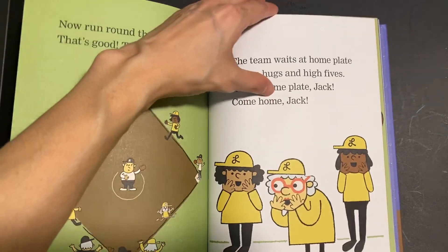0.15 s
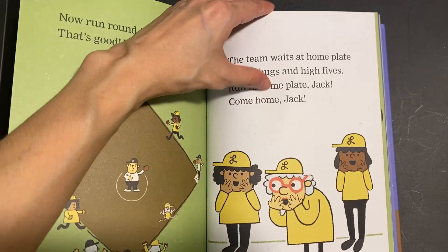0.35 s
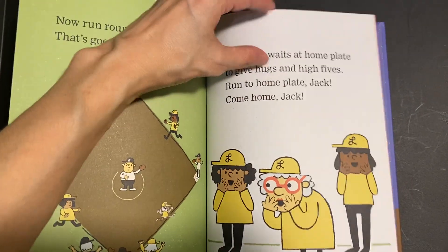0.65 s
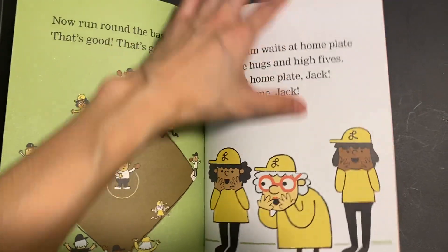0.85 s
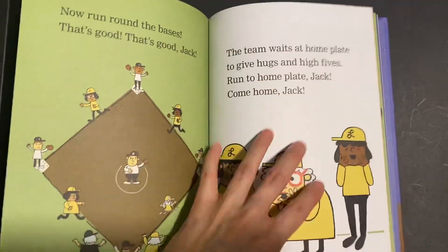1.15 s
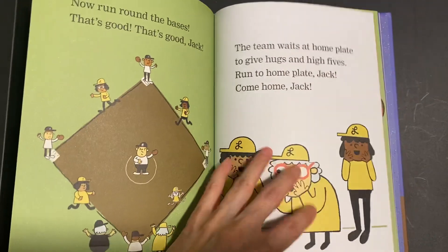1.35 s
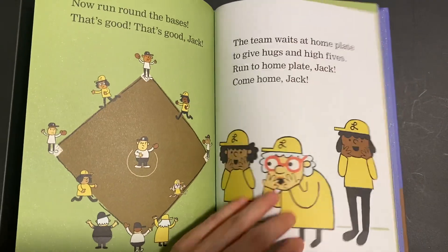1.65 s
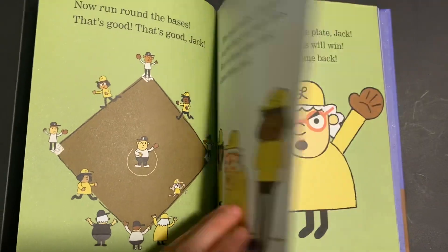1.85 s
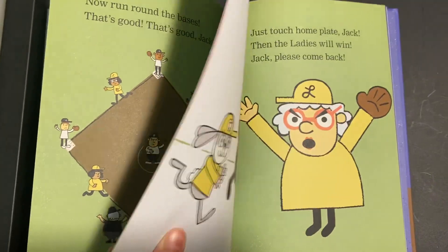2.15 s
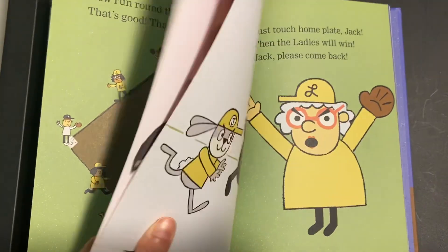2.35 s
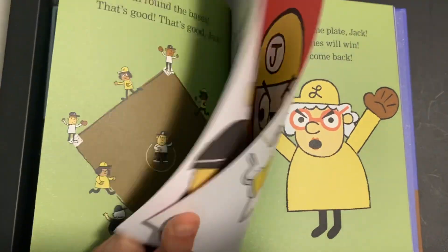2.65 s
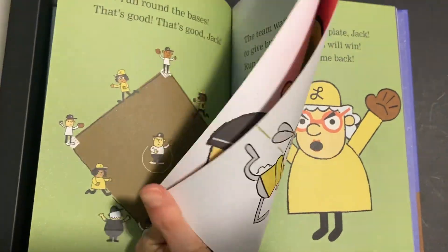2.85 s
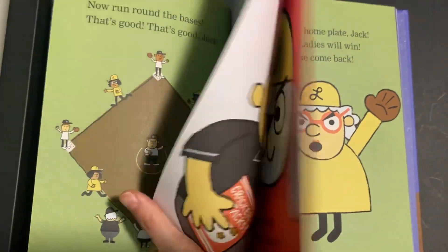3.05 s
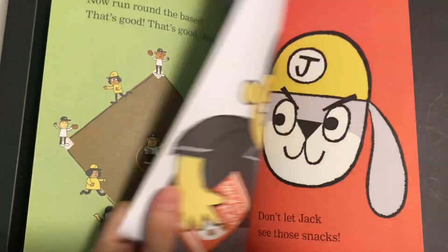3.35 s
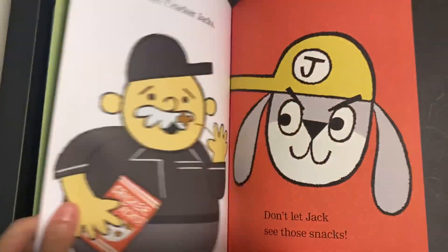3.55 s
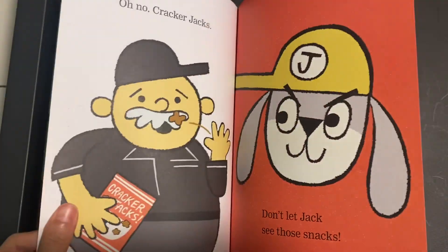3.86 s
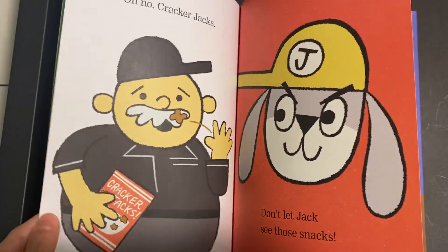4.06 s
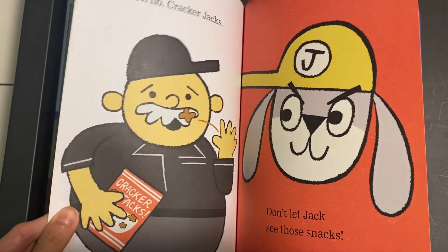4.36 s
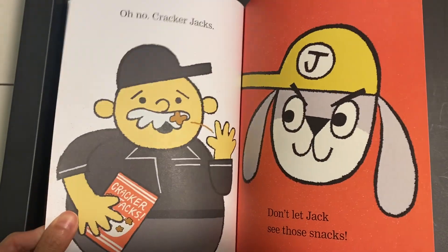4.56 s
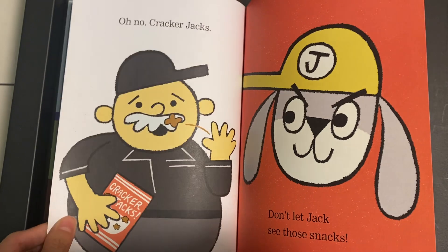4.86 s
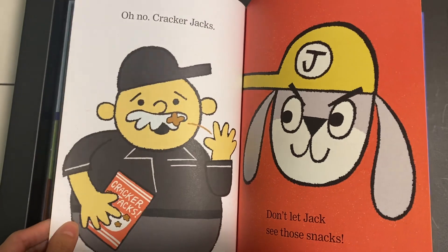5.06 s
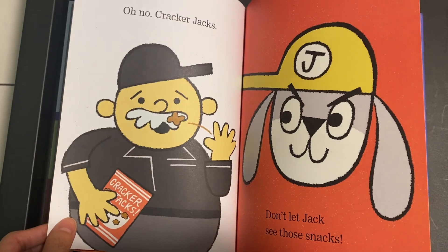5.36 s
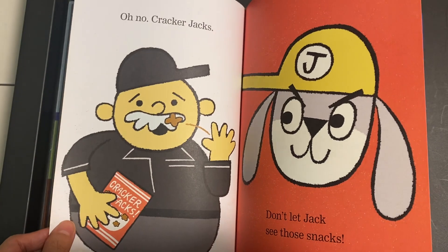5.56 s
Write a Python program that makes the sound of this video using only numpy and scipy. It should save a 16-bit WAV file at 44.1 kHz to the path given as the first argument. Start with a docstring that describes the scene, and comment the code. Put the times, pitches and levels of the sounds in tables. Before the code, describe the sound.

A close stereo pickup above a picture book in a small quiet room, with a low rumble and faint unsteady hum throughout. From 0 s fingertips judder and rub softly on the page; a brisk rub peaks near 0.4 s, with a clustered dull tap at 0.53 s and a softer one at 0.83 s. Light strokes and tiny ticks continue from 1.1 to 1.9 s. At about 2.15-2.5 s the stiff sheet lifts with a scratchy hissing slide, light snaps and a faint low wobble. Sparse scrapes and small flicks follow, with a light snap at 2.8 s and more sliding to 3.5 s. Loud, dry snaps cluster at 3.6-3.85 s, then again at 4.2-4.55 s, strongest around 4.3 and 4.4 s, with deep soft thumps and brief papery twangs. Small ticks and thin rustles fade after 4.6 s, leaving near stillness and a few faint finger touches around 5.4-5.7 s.

```python
"""A small quiet room, with a picture book on a desk, heard from close above.
Fingers rub and catch on a page; its stiff sheet flexes, scrapes over its neighbour and buckles with sharp snaps.
Rubbing is shaped noise with loose clicks; snaps and ticks are bursts of clicks with a fading ring.
Gliding tones make the wobbles, twangs and thumps. A low rumble and an unsteady hum lie underneath."""
import sys
import numpy as np
from scipy import signal
from scipy.fft import rfft, irfft
from scipy.io import wavfile

SR = 44100
rng = np.random.default_rng(int(sys.argv[2]) if len(sys.argv) > 2 else 0)


def unload_audio(sound):
    """Save the sound as a 16-bit wav file, at the path given as the first command line argument."""
    columns = np.transpose(np.atleast_2d(sound))
    # keep every value between -1 and 1, then stretch to whole-number steps
    steps = np.round(np.clip(columns, -1, 1) * 32767)
    wavfile.write(sys.argv[1], SR, steps.astype(np.int16))


N = 251370
TIME = np.arange(N) / SR  # [s]
BLOW = 2 ** 14  # room for one blow and its ring [samples]

# The sheet buckles; levels are relative, before the overall settings in scene():
# (time [s], level [dB], flap [dB], crack [dB], crumple length [s], lag of low tones [cycles],
#  resonance of the buckling patch [Hz], its gain [dB], weak band of the patch [Hz])
SNAPS = [(2.145, -29.5, -13, -24, .0057, 1, 1100, 3, 2100),
         (2.335, -26.5, -14, -27, .0023, 1, 900, 2, 2700), (2.813, -27, -22, -12, .0044, .8, 1900, 4, 2800),
         (3.576, -28.5, -10.5, -18.5, .008, 1.4, 950, 6, 1600),
         (3.618, -14.5, -18, -31, .002, 1.35, 1200, 3, 2200),
         (3.65, -15, -28, -23.5, .0024, .7, 1700, 2, 3200),
         (3.748, -13.7, -18, -21, .0028, 1.15, 2150, 5.5, 770),
         (3.834, -19.5, -16.5, -16, .0018, 1.22, 2500, 6, 760),
         (4.199, -19, -21.5, -19, .006, .7, 850, 5, 1620),
         (4.296, -12, -18.5, -27.5, .002, 1.05, 950, 3, 1750),
         (4.314, -25, -20, -29, .003, .99, 950, 6, 1700), (4.407, -11, -18, -26.5, .0017, 1, 1280, 4, 1680),
         (4.43, -28, -17.5, -27, .0014, 1, 1000, 5, 1700),
         (4.511, -18.5, -18, -22, .004, 1.2, 1100, 6, 1650),
         (4.549, -18.5, -27, -17.5, .0023, .87, 2000, 2.5, 750)]
# Widths of a snap's resonance and weak band [octaves], and the depth of that band [dB]
PATCH_OCTAVES, DIP_OCTAVES, DIP_DB = .3, .1, 7.5
# Tone colour of a snap: (frequency [Hz], gain [dB])
SNAP_COLOUR = [(30, -6.5), (80, 9), (130, 2), (260, 4.5), (410, -8.5), (580, -4), (750, -4), (950, -2.5),
               (1400, -5.5), (2250, -5), (2700, -11), (4000, 4), (7000, 2), (11000, -7.5), (16000, -20.5)]

# How long the ring of sheet, desk and room takes to fall by 60 dB: (frequency [Hz], time [s])
RING_T60 = [(60, .4), (120, .14), (240, .38), (480, .38), (960, .18), (1920, .36), (3840, .38), (7680, .3)]
# Strength of that ring before the overall ring setting: (frequency [Hz], energy against the blow [dB])
RING_DB = [(60, 4.5), (250, -.5), (600, -2.5), (1500, -4.5), (3000, -7.5), (8000, -2.5)]
# Steady ringing tones of the room, each strength varied by chance and then by the ring setting:
# (frequency [Hz], time to fall by 60 dB [s], energy against the blow [dB])
ROOM_MODES = [(183.9, .2, -21), (266, .19, -21), (345, .22, -19.5), (499, .28, -22), (560, .2, -19),
              (745, .14, -30), (946, .16, -26), (1397, .12, -29), (1886, .12, -30), (2078, .1, -28),
              (3070, .073, -32)]
RING_BUILD_S, RING_LUMPS_DB = .003, 2.2  # the ring builds up, then dies unevenly
RING_CRACKLE_DB, RING_CRACKLES_PER_S = 3.0, 450  # the paper crackles on while a blow dies away

# Fingers catch and paper edges flick; levels are relative, before the overall settings:
# (time [s], level [dB], treble [dB], length [s])
TICKS = [(.317, -38, -1, 0.003), (.34, -24, -4.5, 0.0036), (.519, -16.5, -19, 0.002),
         (.530, -11.5, -19.5, 0.0046), (.540, -17, -12, 0.0029), (.826, -21, -29, 0.0035),
         (.847, -27, -34, 0.0046), (.895, -34, -30, 0.003), (1.122, -43, -30, 0.0033),
         (1.176, -38.5, -15, 0.0069), (1.632, -32.5, -26, 0.0023), (1.651, -34, -26, 0.0035),
         (1.679, -35, -35, .003), (2.123, -35, -12, 0.0041), (2.218, -31.5, 5, 0.0077),
         (2.764, -44, 3, 0.0011), (3.019, -31, -9, .002), (3.025, -46, 16, 0.0021),
         (3.113, -42.5, -7, 0.0018), (3.244, -30, -24.5, 0.0025), (3.633, -22, -29.5, .005),
         (3.767, -23, -31, 0.0041), (3.789, -25, -34, .004), (3.861, -21.5, -15.5, 0.0045),
         (4.207, -24, -9, 0.005), (4.324, -18, -15.5, 0.0022), (4.338, -34, -35, 0.0038),
         (4.458, -32.5, -30.5, 0.0035), (4.533, -25, -9, 0.0067), (4.63, -24.5, -13, 0.0014),
         (4.666, -28, -13, 0.002), (4.713, -38, -2, 0.0051), (4.974, -43, -30, 0.004)]
# Tone colour of ticks and single fibre clicks: (frequency [Hz], gain [dB])
TICK_COLOUR = [(80, -12), (350, -16.5), (650, -6.5), (880, -1), (1100, -4.5), (1350, 2), (1800, -4),
               (2300, -2.5), (2700, -3.5), (3500, -9.5), (4300, -1.5), (5100, 4), (6500, -2.5), (11000, -7),
               (16000, -11.5)]
# A fingertip judders in a short run of slips, also set before the overall tick settings:
# (time [s], length [s], level of the first slip [dB])
JUDDERS = [(0.0645, .054, -35), (0.214, .026, -34), (0.260, .015, -37)]
# Time between slips [s], its random share, fading [dB/s], treble [dB]
SLIP_S, SLIP_JITTER, SLIP_FADE_DB_PER_S, SLIP_TOP_DB = 0.0094, 0.071, 36, -5
SLIP_LENGTH_S, SLIP_VARY_DB = .003, 1.5  # each slip is brief and has a strength of its own

# Sheet slides on sheet; levels are before the mix:
# (time [s], swell [s], ease-off [s], rub [dB], hiss against rub [dB], body against rub [dB])
SHEET_STROKES = [(1.9, .025, .04, -55, -14, 8), (2.0, 0.036, 0.16, -73.5, -34, 22.5),
                 (2.207, 0.009, 0.07, -33.5, -2.5, -9), (2.28, .015, .035, -46, -7, -3),
                 (2.335, 0.0032, .2, -34.5, -7, -7.5), (2.48, 0.07, 0.19, -43, -1, -3),
                 (2.75, 0.015, 0.23, -55, -7, -9), (2.905, 0.0023, 0.095, -53, -1.5, -13),
                 (3.009, 0.0095, 0.0067, -37, 0.5, -30), (3.035, 0.0073, 0.17, -57, -8, 10),
                 (3.234, 0.013, 0.11, -41.5, 2.5, -15.5), (3.31, 0.07, 0.09, -47, 4, -16.5),
                 (3.44, 0.074, 0.048, -47.5, -6.5, -6.5), (3.932, 0.016, 0.033, -43, -7.5, -14.5),
                 (3.96, 0.048, 0.051, -45, -1, -4.5), (4.075, 0.054, 0.0032, -37, -8, -11),
                 (4.14, 0.0075, 0.62, -66.5, -3, 10), (4.714, 0.0025, 0.11, -55.5, 0, -22),
                 (4.852, 0.02, 0.15, -55.5, 2.5, -14), (5.03, 0.049, 0.19, -68.5, -4, -6.5),
                 (5.258, 0.012, 0.087, -62.5, -1.5, -18.5)]
# Tone colour of the sliding sheet, before its three bands are levelled: (frequency [Hz], gain [dB])
SHEET_COLOUR = [(150, 9.5), (270, 2), (520, -5), (1000, -4), (1650, -3), (2400, -3.5), (3300, -2.5),
                (4300, -2), (5500, -2), (6500, -4), (7500, -3.5), (11000, -8.5), (16000, -14.5)]
# The curl of the sheet lifts one band of its hiss for a while; gain is before the loss below:
# (time [s], length [s], frequency [Hz], gain at the top [dB])
CURLS = [(2.195, .115, 1750, 10.5), (2.2, .075, 5400, 7), (2.2, .045, 6200, 5), (2.2, .075, 3680, 9),
         (2.23, .085, 2880, 8), (2.32, .21, 3250, 7.5), (2.33, .1, 2100, 4), (2.36, .23, 1620, 8),
         (2.38, .2, 5750, 4), (3.22, .17, 1490, 5.5), (3.93, .057, 3280, 7), (3.98, .077, 5900, 7.5),
         (4.08, .06, 2930, 7), (4.69, .08, 3600, 6), (4.76, .28, 1580, 8), (4.8, .24, 5300, 6),
         (4.84, .12, 4250, 6), (5.05, .33, 1600, 5), (5.24, .06, 4300, 10), (5.28, .11, 5400, 9)]
CURL_Q, CURL_LOSS_DB = 8.4, 1.5  # sharpness of the band; how far all the hiss is turned down meanwhile

# Fingers stroke the page; levels are before the mix:
# (time [s], swell [s], ease-off [s], rub [dB], hiss against rub [dB], body against rub [dB])
FINGER_STROKES = [(0.0, 0.0088, 0.012, -52, -12, -4), (.02, 0.044, 0.32, -65.5, -7, 6),
                  (.32, 0.03, 0.06, -48.5, -15, -7), (.41, 0.079, 0.027, -39.5, -1.5, -12),
                  (.655, 0.049, 0.08, -60, -15, 0), (.745, 0.0063, 0.024, -61, 4, -12),
                  (.812, 0.012, 0.11, -48, 3, -2), (1.1, 0.0045, 0.14, -58.5, -1.5, -4),
                  (1.23, 0.12, 0.019, -54.5, 1, -13.5), (1.37, 0.082, 0.031, -58, -2, -10),
                  (1.49, 0.071, 0.075, -51, 4, -16.5), (1.58, 0.076, 0.16, -56.5, -28, -2),
                  (1.735, 0.019, 0.32, -54, -2.5, -4.5), (5.428, 0.0083, 0.0033, -55.5, -2, -17),
                  (5.628, 0.006, 0.0061, -59.5, -1, -15.5), (5.668, 0.0073, .01, -61.5, 0, -17)]
# Tone colour of the fingers, before the three bands are levelled: (frequency [Hz], gain [dB])
FINGER_COLOUR = [(150, 4), (380, -10), (700, -10), (870, -6), (1100, -3.5), (1400, -.5), (1800, -5.5),
                 (2400, -5.8), (3600, -8.3), (4400, -8.5), (5150, -7.5), (6300, -12.5), (8000, -13.5),
                 (12000, -12.5), (16000, -16.5)]
# The flat page answers a fingertip: (frequency [Hz], width [Hz], gain at the top [dB])
PAGE = [(867, 78, 2), (1530, 100, 3.5), (2320, 150, -0.5)]

# Before it swells, a stroke makes contact: rise time [s] and rise [dB]
CONTACT_S, CONTACT_DB = 0.014, 26
SWELL_DB, SAG_DB = 11, 5  # rise up to the peak, and fall after it
LIFT_S, LIFT_DB, TAIL_T60_S = 0.0097, 10.5, 0.3  # contact breaks, then a faint tail dies in the room
RUSTLE_HZ = np.geomspace(300, 9000, 15)  # centres of the flickering bands

# The sheet flexes and wobbles: (time [s], length [s], middle pitch [Hz], level [dB])
WOBBLES = [(0.554, .038, 470, -51.5), (0.838, 0.032, 446, -52), (0.876, .04, 299.4, -58),
           (1.585, 0.067, 658, -55.5), (1.729, 0.0215, 573, -51.5), (1.763, 0.066, 333, -63),
           (1.895, .07, 365, -49.5), (1.95, 0.055, 284, -59), (2.02, 0.03, 280, -49),
           (2.034, 0.032, 410, -54.5), (2.06, 0.066, 252, -63), (2.137, 0.042, 308.7, -54),
           (3.025, 0.042, 279, -55), (3.067, 0.0404, 434.4, -55), (3.141, 0.027, 261, -58.5),
           (4.559, .032, 491, -46)]
# Bending tones of the wobbling sheet: (multiple of the pitch [ratio], relative level [dB])
BENDING = [(1.002, 2), (1.598, -9), (2.2, 0.5), (2.9, -16), (3.8, -9)]
RELAX_OCTAVES_PER_S = 4.53  # the pitch of a wobble sinks as the bend relaxes
# After a snap the taut sheet twangs on one sinking tone, before its level flutters:
# (time [s], length [s], middle pitch [Hz], peak level [dB])
TWANGS = [(3.756, .044, 930, -44), (4.2, .02, 2320, -43), (4.318, .034, 940, -46), (4.556, .04, 1020, -48)]
# The sheet drops on the air beneath it with a deep thump, before its level flutters:
# (time [s], length [s], middle pitch [Hz], peak level [dB])
THUMPS = [(2.317, 0.059, 91, -52), (2.502, .08, 65.2, -41.5), (3.033, 0.081, 80, -51),
          (3.842, 0.053, 90, -41), (4.412, 0.031, 75.4, -26), (4.428, 0.034, 111.7, -42),
          (4.51, .066, 88.4, -31.5), (4.618, 0.14, 60.4, -45.5)]

# Early echoes off desk and facing page: (delay left [s], delay right [s], level [dB])
ECHOES = [(.0017, 0.0022, -22.5), (.0043, 0.0024, -29), (.0091, 0.0092, -21), (0.0192, .0178, -26.5)]
# How far the paper sounds lean to the left: (frequency [Hz], left against right [dB])
LEANING = [(60, 1.6), (200, 2), (380, 2.5), (620, 10), (900, 7.5), (1350, 8.5), (2300, 6), (4500, 3),
           (8000, 0), (15000, 0)]
# How wide the noises spread: (frequency [Hz], side against middle [dB])
SPREAD = [(60, -8), (300, -4.5), (700, -4), (1400, -4.5), (3000, -4), (7000, -11), (15000, -14)]
# Phase between the microphone ports: (frequency [Hz], lead of the left [radians])
PORT_PHASE = [(340, -0.23), (800, -1.57), (1550, 1.27), (2100, 0.28), (2650, 1.4), (3100, 0.28),
              (4600, 0.86), (5600, -1.5), (7000, 0.33)]
# In the treble the ports pass in and out of opposite phase: (frequency [Hz], lag of the left [cycles])
PORT_TURNS = [(7300, 0), (8400, .5), (9400, .5), (10500, 1), (11500, 1), (12600, 1.5), (13900, 1.5),
              (14700, 2)]
CUTOFF_HZ = 16000

# Tone colour of the room rumble, before its level is set: (frequency [Hz], relative level [dB])
ROOM_COLOUR = [(20, -40), (35, -16.5), (60, -0.5), (80, -6.5), (115, -12), (150, -15), (190, -22.5),
               (260, -27), (400, -38.5), (650, -40.5), (1200, -43.5), (3000, -53.5), (6000, -54),
               (16000, -67.5)]
ROOM_DB = -59
HUM_HZ, HUM_DB = 56.4, -58.5


def snaps(level_db, crumple_db, ring_db, flap_db, crack_db, lean_db, rebound_db, travel_s, lowest_hz):
    """A buckle sends a bending wave through the sheet: treble arrives first and sweeps down into a low thud."""
    out, hz = np.zeros((2, N)), bins(BLOW)
    pulse = causal(1 / (1 + (hz / 3800) ** 2)) * from_db(lean_db * np.array([[1], [-1]]))
    treble = causal((hz + 30) / (hz + 3000))
    bass = causal(1 / (1 + (hz / 450) ** 2))
    for s, db, flap, crack, length, lag, patch_hz, patch_db, dip_hz in SNAPS:
        bending = np.exp(-2j * np.pi * (lag * np.log(1 + hz / lowest_hz) + travel_s * hz))
        shelves = [(280, flap + flap_db), (700, 0), (2400, 0), (4800, crack + crack_db)]
        patch = patch_db * bump(hz, patch_hz, PATCH_OCTAVES) - DIP_DB * bump(hz, dip_hz, DIP_OCTAVES)
        colour = causal(from_db(at_hz(SNAP_COLOUR, hz) + at_hz(shelves, hz) + patch))
        # the low flap comes back from the edges of the page
        rebound = from_db(rebound_db) * bass * np.exp(-2j * np.pi * hz * rng.uniform(0.022, 0.033))
        crumpling = from_db(crumple_db) * crumple(length, rise=0.00027) * treble
        blow = pulse * bending * (1 + rebound) + crumpling
        ringing = from_db(ring_db) * ring() * bending
        add(out, s, from_db(db + level_db) * dying(colour * (blow + ringing)))
    return out


def crumple(length, rise):
    """Spectrum of a short run of tiny fibre clicks, of unit energy."""
    age = TIME[:BLOW]
    shape = np.exp(-age / length) * (1 - np.exp(-age / rise))
    clicks = rng.standard_normal(BLOW) * from_db(2 * rng.standard_normal(BLOW)) * shape
    return rfft(clicks / np.sqrt(np.sum(clicks ** 2)))


def ring():
    """Spectrum of the tail after a blow: crackling noise dying band by band, plus the room's own tones."""
    t, hz = TIME[:BLOW], bins(BLOW)
    steps = np.interp(t * RING_CRACKLES_PER_S, np.arange(400), rng.standard_normal(400))
    crackle = from_db(RING_CRACKLE_DB * steps)
    mid, side = rfft(rng.standard_normal((2, BLOW)) * rms_one(crackle))
    noise = mid + side * from_db(at_hz(SPREAD, hz)) * [[1], [-1]]
    centres = np.geomspace(60, 15360, 9)  # one band per octave
    tail = 0
    for k, centre in enumerate(centres):
        share = np.interp(np.log(hz), np.log(centres), np.arange(len(centres)) == k)
        decay = np.exp(-np.log(1000) * t / at_hz(RING_T60, centre))
        build = 1 - np.exp(-t / RING_BUILD_S)
        lumps = np.interp(t, np.linspace(0, t[-1], 48), rng.standard_normal(48))
        fade = decay * build * from_db(RING_LUMPS_DB * lumps)
        gain = from_db(at_hz(RING_DB, centre)) / np.sqrt(np.sum(fade ** 2))
        tail = tail + irfft(noise * share) * fade * gain
    for mode_hz, t60, db in ROOM_MODES:
        mode = np.sin(2 * np.pi * (mode_hz * t + rng.random())) * np.exp(-np.log(1000) * t / t60)
        tail = tail + from_db(db + 3.1 * rng.standard_normal()) * mode / np.sqrt(np.sum(mode ** 2))
    return rfft(tail)


def dying(spectrum):
    """A blow's waveform, fading to nothing at its end."""
    return irfft(spectrum) * (1 - np.linspace(0, 1, BLOW) ** 2) ** 2


def ticks(level_db, ring_db, top_db, rise_share):
    """An edge or a fingertip lets go in a brief burst of clicks, followed by a ring."""
    out, hz = np.zeros((2, N)), bins(BLOW)
    dull = causal(1 / np.sqrt(1 + (hz / 3000) ** 2))
    for s, db, top, length in TICKS + judders():
        shelf = at_hz([(2800, 0), (5500, top + top_db)], hz)
        colour = causal(from_db(at_hz(TICK_COLOUR, hz) + shelf))
        burst = crumple(length, rise_share * length)
        with_ring = burst * (1 + from_db(ring_db) * dull * ring())
        add(out, s, from_db(db + level_db) * dying(colour * with_ring))
    return out


def judders():
    """Stick and slip: nearly even ticks that tend to weaken, as (time [s], level [dB], treble [dB], length [s])."""
    slips = []
    for s, length, first_db in JUDDERS:
        for age in np.arange(0, length, SLIP_S):
            when = s + age + SLIP_S * SLIP_JITTER * rng.standard_normal()
            db = first_db - SLIP_FADE_DB_PER_S * age + SLIP_VARY_DB * rng.standard_normal()
            slips.append((when, db, SLIP_TOP_DB, SLIP_LENGTH_S))
    return slips


def sliding_sheet():
    """Sheet rubs on sheet: noisy grains, flickering bands and lone clicks, coloured by the curl."""
    sheet = friction(SHEET_STROKES, SHEET_COLOUR, grain_db=1.0, slips_per_s=8000, judder_db=1.66,
                     body_hz=840, hiss_hz=4310)
    sheet = rustle(sheet, depth_db=3.2, rate=28)
    return curled(sheet + grit(SHEET_STROKES, per_s=300, spread_db=10, level_db=-14))


def stroking_fingers():
    """Fingertips rub the page: noisy grains, flickering bands and lone clicks."""
    fingers = friction(FINGER_STROKES, FINGER_COLOUR, grain_db=1.0, slips_per_s=6000, judder_db=1.07,
                       body_hz=770, hiss_hz=4800)
    fingers = rustle(fingers, depth_db=2.8, rate=40)
    return fingers + grit(FINGER_STROKES, per_s=240, spread_db=12, level_db=-3)


def friction(strokes, colour, grain_db, slips_per_s, judder_db, body_hz, hiss_hz):
    """Paper fibres catch and slip: dense uneven grains whose strength judders along the stroke."""
    slips = rng.random(N) < slips_per_s / SR
    sizes = slips * from_db(grain_db * np.minimum(rng.exponential(1, N), 4))
    grains = widen(*(rng.standard_normal((2, N)) * (sizes + 0.43)))
    spectrum, hz = rfft(coloured(grains, colour)), bins(N)
    above_body = 1 / (1 + (body_hz / hz) ** 8)
    above_rub = 1 / (1 + (hiss_hz / hz) ** 8)
    no_rumble = 1 / (1 + (140 / hz) ** 4)
    shares = [no_rumble * (1 - above_body), above_body - above_rub, above_rub]  # body, rub, hiss
    sound = 0
    for share, gain in zip(shares, stroke_levels(strokes)):
        sound = sound + rms_one(irfft(spectrum * share, N)) * gain
    return sound * from_db(judder_db * drift(32))


def stroke_levels(strokes):
    """Gains of body, rub and hiss: each stroke touches down, swells, sags, lifts off and dies away."""
    power = np.zeros((3, N))
    lifted_db = -SAG_DB - LIFT_DB
    shape_db = [-SWELL_DB - CONTACT_DB, -SWELL_DB, 0, -SAG_DB, lifted_db, lifted_db - 60]
    for s, swell_s, ease_s, db, hiss_db, body_db in strokes:
        corners = s - CONTACT_S + np.cumsum([0, CONTACT_S, swell_s, ease_s, LIFT_S, TAIL_T60_S])
        during = TIME[slice(*np.searchsorted(TIME, corners[[0, -1]]))]
        gain = from_db(db + np.interp(during, corners, shape_db))
        add(power, corners[0], (from_db([[body_db], [0], [hiss_db]]) * gain) ** 2)
    return np.sqrt(power)


def rustle(x, depth_db, rate):
    """Neighbouring bands flicker independently as different patches of paper touch."""
    spectrum, log_hz, out = rfft(x), np.log(bins(N)), 0
    for pick in np.eye(len(RUSTLE_HZ)):
        gains = from_db(depth_db * rng.standard_normal(400))
        flicker = np.interp(TIME * rate, np.arange(len(gains)), gains)
        band = irfft(spectrum * np.interp(log_hz, np.log(RUSTLE_HZ), pick), N)
        out = out + band * flicker
    return out


def grit(strokes, per_s, spread_db, level_db):
    """Single fibres catch: lone clicks that stand out more the harder the rub."""
    rub = stroke_levels(strokes)[1]
    catches = rng.random(N) < per_s / SR
    sizes = catches * from_db(spread_db * rng.random(N)) * rng.choice([-1, 1], N)
    return from_db(level_db) * rms_one(coloured(sizes, TICK_COLOUR)) * rub * (rub / rub.max()) ** .25


def curled(x):
    """Each curl of the sheet forms, rings with the hiss and opens out again."""
    out = x.copy()
    for s, length, hz, db in CURLS:
        start, count = int(s * SR), int(length * SR)
        part = x[:, start:start + count]
        ringing = from_db(-CURL_LOSS_DB) * resonate(part, [(hz, hz / CURL_Q, db)])
        add(out, s, (ringing - part) * signal.windows.tukey(count, .5))
    return out


def resonate(x, peaks):
    """The paper changes the strength of a few narrow bands of the sound made on it."""
    out = x
    for hz, width, db in peaks:
        out = out + (from_db(db) - 1) * signal.lfilter(*signal.iirpeak(hz, hz / width, fs=SR), x)
    return out


def wobbles(waver, flutter_db):
    """The bending tones glide down together as the curve of the sheet relaxes."""
    out = np.zeros((2, N))
    wavering, flutter = drift(88), drift(120)
    for s, length, hz, db in WOBBLES:
        count = int(length * SR)
        glide = hz * 2 ** (RELAX_OCTAVES_PER_S * (length / 2 - TIME[:count]))
        sound = 0
        for multiple, mode_db in BENDING:
            part = rng.integers(N // 2) + np.arange(count)  # each tone wavers in its own way
            phase = 2 * np.pi * np.cumsum(glide * multiple * (1 + waver * wavering[part])) / SR
            sound = sound + from_db(mode_db + flutter_db * flutter[part]) * np.sin(phase)
        add(out, s, from_db(db) * rms_one(sound * signal.windows.tukey(count, .7)))
    return out


def twangs():
    """The taut sheet sings briefly on one sinking, fluttering tone."""
    return glides(TWANGS, sink_octaves_per_s=4.5, flutter_db=3.5)


def thumps():
    """The sheet drops on the air beneath it: a short deep tone that sinks."""
    return glides(THUMPS, sink_octaves_per_s=3.6, flutter_db=0.6)


def glides(rows, sink_octaves_per_s, flutter_db):
    """The sheet swings on one tone for a moment, slowing as its tension eases."""
    out, flutter = np.zeros((2, N)), from_db(flutter_db * drift(90))
    for s, length, hz, db in rows:
        count = int(length * SR)
        glide = hz * 2 ** (sink_octaves_per_s * (length / 2 - TIME[:count]))
        tone = np.sin(2 * np.pi * np.cumsum(glide) / SR)
        add(out, s, from_db(db) * tone * signal.windows.tukey(count, .7))
    return out * flutter


def near_desk(x):
    """Each microphone gets the early echoes at its own times."""
    echoes = [sum(from_db(row[2]) * late(x[ear], row[ear]) for row in ECHOES) for ear in range(2)]
    return x + np.array(echoes)


def at_microphones(x):
    """All the paper sounds lean to the left port and reach the two ports in different phase."""
    hz = bins(N)
    half = from_db(at_hz(LEANING, hz) / 2) * np.exp(1j * at_hz(PORT_PHASE, hz) / 2)
    return irfft(rfft(x) * np.array([half, 1 / half]), N)


def room():
    """Low rumble made of shaped noise, with a hum that wanders in phase and strength."""
    rumble = rms_one(coloured(widen(*rng.standard_normal((2, N))), ROOM_COLOUR))
    tone = np.sqrt(2) * np.sin(2 * np.pi * HUM_HZ * TIME + 0.5 * drift(4.4))
    hum = tone * from_db(0.83 * drift(7.4))
    return from_db(ROOM_DB) * rumble + from_db(HUM_DB) * hum


def from_db(db):
    """Decibels to gain."""
    return 10 ** (np.asarray(db) / 20)


def rms_one(x):
    """Scale to an average strength (rms) of 1."""
    return x / np.sqrt(np.mean(x ** 2) + 1e-20)


def bins(size):
    """Frequencies of a spectrum [Hz], none below 1."""
    return np.maximum(np.fft.rfftfreq(size, 1 / SR), 1)


def at_hz(points, hz):
    """Read a table on a log-frequency axis."""
    f, value = np.transpose(points)
    return np.interp(np.log(hz), np.log(f), value)


def bump(hz, centre_hz, octaves):
    """A bell of height 1 on a log-frequency axis."""
    return np.exp(-.5 * (np.log2(hz / centre_hz) / octaves) ** 2)


def coloured(x, points):
    """Filter a whole-length sound with the gains of a (frequency [Hz], gain [dB]) table."""
    return irfft(rfft(x) * from_db(at_hz(points, bins(N))), N)


def causal(gain):
    """Minimum-phase response with these gains: nothing sounds before the blow."""
    cepstrum = irfft(np.log(gain))
    half = len(cepstrum) // 2
    cepstrum[1:half] *= 2
    cepstrum[half + 1:] = 0
    return np.exp(rfft(cepstrum))


def drift(rate):
    """A slow random wander of spread 1, made by smoothing noise above a rate [Hz]."""
    return rms_one(irfft(rfft(rng.standard_normal(N)) / (1 + (bins(N) / rate) ** 2), N))


def late(x, delay):
    """The sound after a delay in seconds."""
    return np.interp(TIME - delay, TIME, x, left=0)


def widen(mid, side):
    """Left and right from a shared part and a part of opposite sign."""
    return mid + coloured(side, SPREAD) * [[1], [-1]]


def add(out, s, sound):
    """Mix a sound in at time s."""
    start = max(0, int(s * SR))
    out[:, start:start + sound.shape[-1]] += sound[..., :N - start]


def scene():
    """Snapping, sliding and flexing paper over the quiet room."""
    snapping = snaps(level_db=25.7, crumple_db=2.2, ring_db=-4.2, flap_db=14.3, crack_db=3.4,
                     lean_db=1.0, rebound_db=-7.5, travel_s=.0004, lowest_hz=12.06)
    ticking = ticks(level_db=19.5, ring_db=-6.0, top_db=0.5, rise_share=0.4)
    touch = resonate(from_db(-4.5) * stroking_fingers() + ticking, PAGE)
    sliding = from_db(-4.5) * sliding_sheet()
    flexing = wobbles(waver=0.1905, flutter_db=4.5)
    paper = snapping + near_desk(touch + sliding + flexing) + twangs() + thumps()
    return at_microphones(paper) + room()


def record(dry):
    """The left port turns in phase through the treble; the top is cut."""
    left, right = dry
    turns = np.interp(bins(N), *np.transpose(PORT_TURNS))
    left = irfft(rfft(left) * np.exp(-2j * np.pi * turns), N)
    low_pass = signal.ellip(10, .1, 80, CUTOFF_HZ, fs=SR, output="sos")
    return signal.sosfilt(low_pass, [left, right])


dry = scene()
out = record(dry)
unload_audio(out)
```